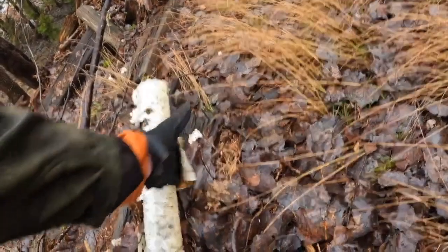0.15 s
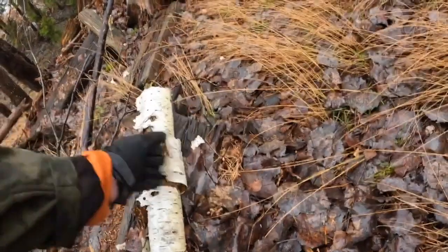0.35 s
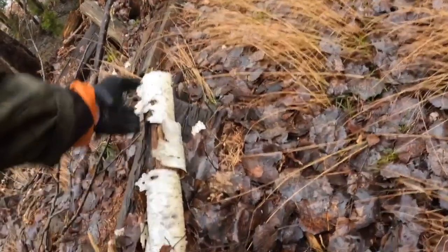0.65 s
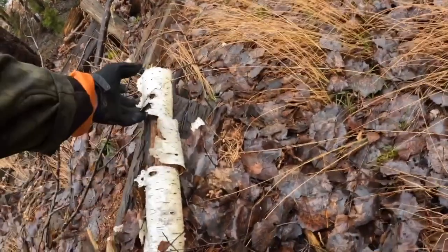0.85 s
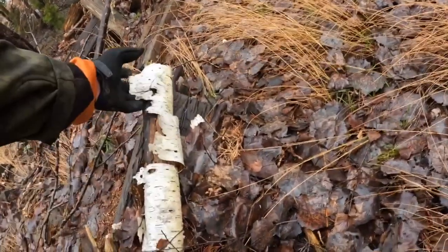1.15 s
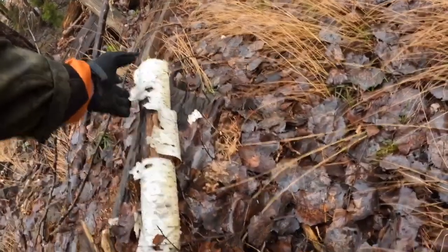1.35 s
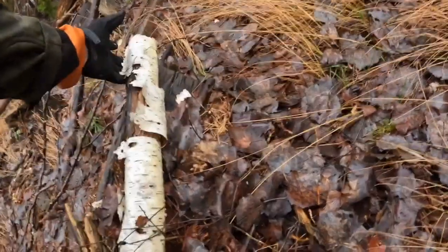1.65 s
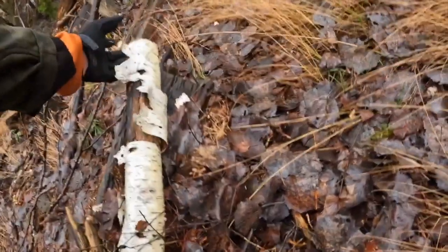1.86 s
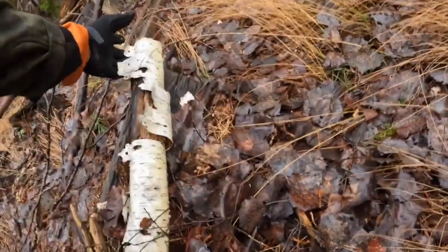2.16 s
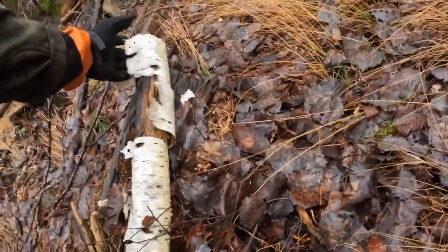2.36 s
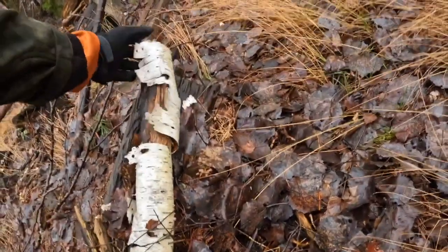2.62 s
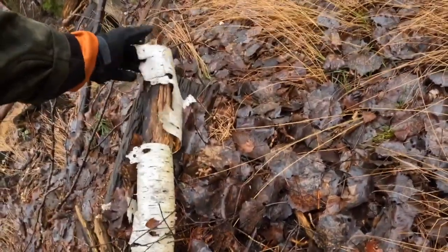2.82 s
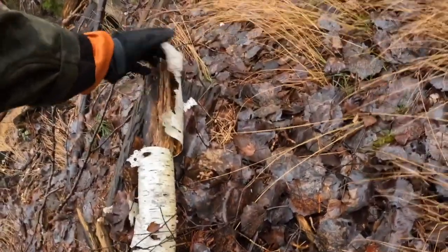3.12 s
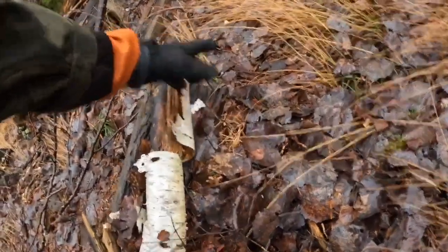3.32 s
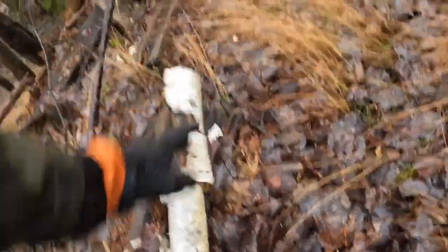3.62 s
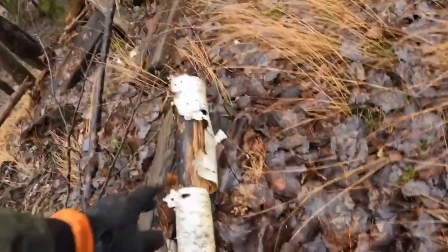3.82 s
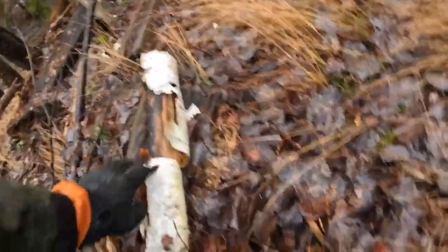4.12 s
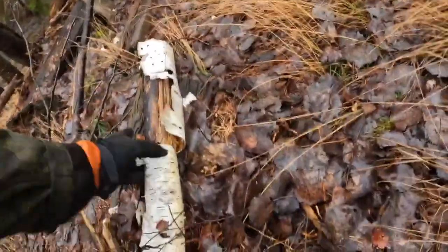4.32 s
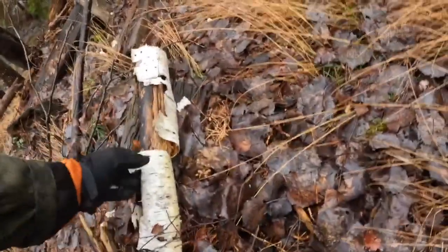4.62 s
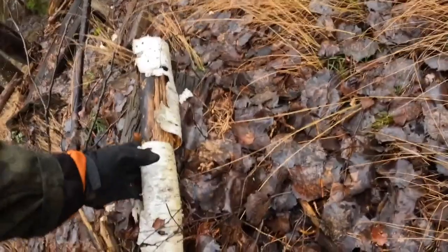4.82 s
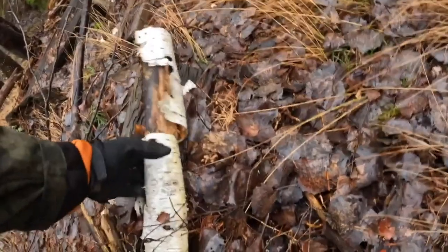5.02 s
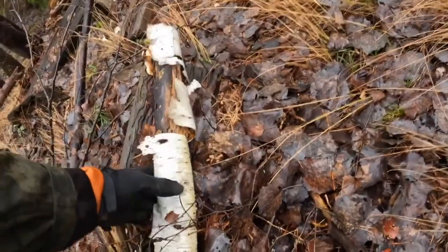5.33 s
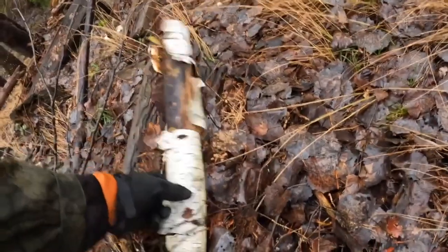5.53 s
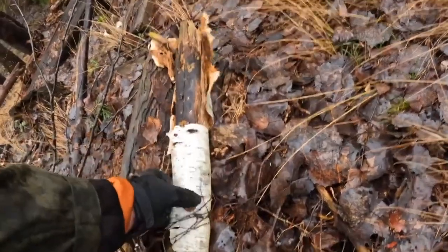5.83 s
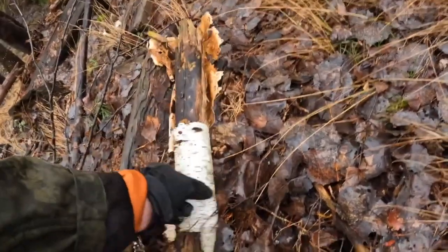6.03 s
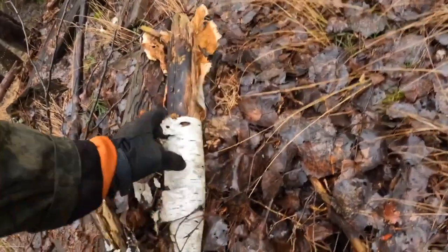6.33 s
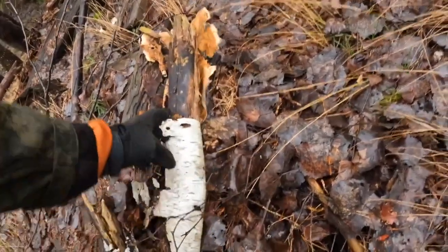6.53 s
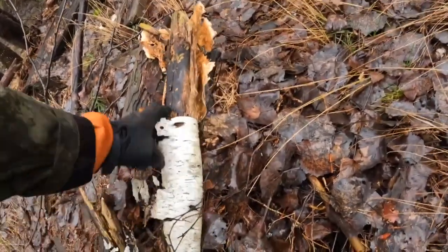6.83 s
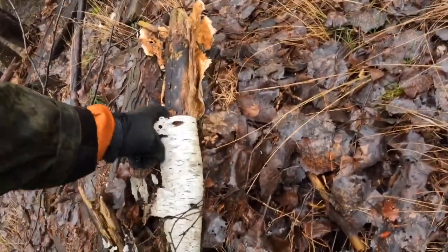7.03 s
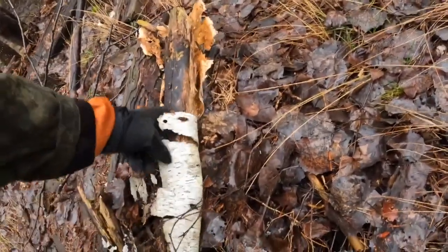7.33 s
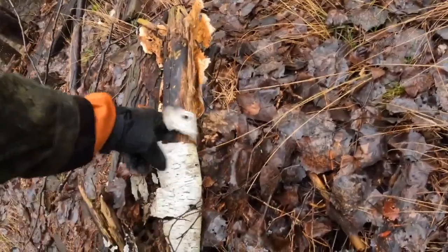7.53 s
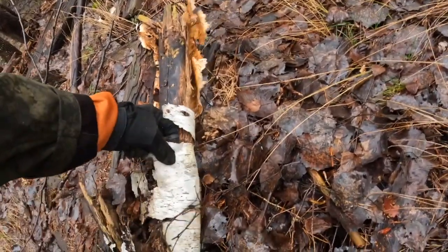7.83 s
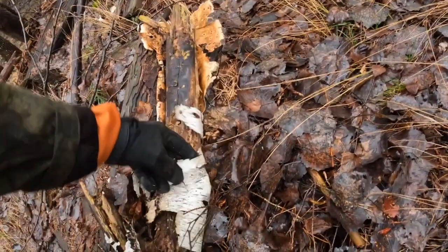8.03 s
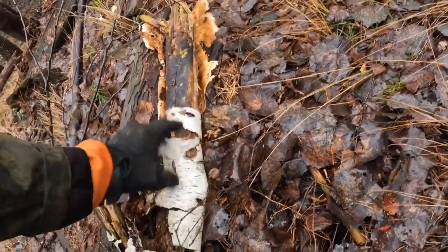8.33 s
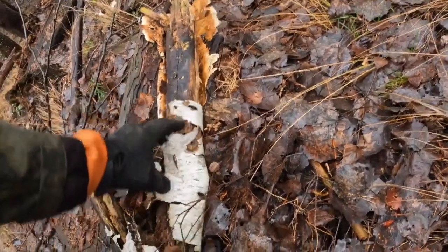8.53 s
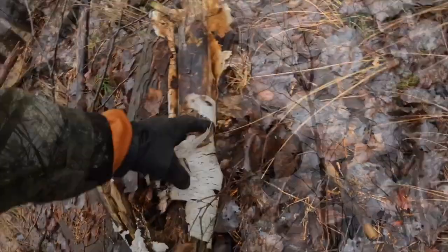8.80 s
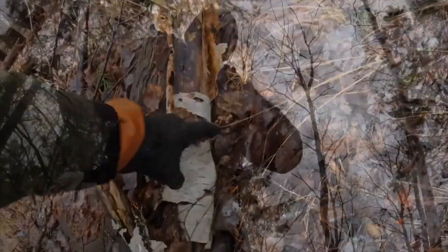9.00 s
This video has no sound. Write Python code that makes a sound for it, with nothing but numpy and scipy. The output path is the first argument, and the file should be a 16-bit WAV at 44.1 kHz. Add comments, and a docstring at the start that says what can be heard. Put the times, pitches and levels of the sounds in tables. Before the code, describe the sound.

Outdoors among quiet trees, a low uneven wind rumble and very faint airy hush run throughout. A gloved hand works dry bark an arm's length from the stereo microphone, nearly centred and with little reverberation. At 0 s a crisp crack and dull knock start it; sharp snaps follow at 1.1 s, with lighter crackles near 1.9 and 2.5-2.9 s. From 3 to 4.4 s it is sparser, with soft dull taps and a breathy sleeve swish on the left near 3.8 s. Cracking resumes at 4.5 s, with a bright snap at 4.9, then builds into dense papery tearing from 5.2 to 5.8 s. More clusters come at 6.0-6.25, 6.6 and 7.0-7.3 s, the last very bright. The loudest, woodiest breaks fall around 7.9-8.0 s. Snaps thin out; a tiny high glove squeak comes at 8.4 s, a lower wavering rough one at 8.8-8.9, then final cracks near 9 s.

```python
"""A gloved hand peels dry papery bark off a rotten branch on the forest floor, an arm's length away.
From the start there is a wind rumble and the faint hush of the woods, both made of shaped noise. Over them,
fibres snap as ringing bursts, bark rustles as flickering noise and loose pieces drop as short, dull rings.
A jacket sleeve swishes near the left port as smooth noise. Towards the end the glove squeaks twice:
a short high wavering tone, then a lower wavering stack of partials."""
import sys
import numpy as np
from scipy import signal
from scipy.fft import rfft, irfft
from scipy.io import wavfile
from scipy.ndimage import uniform_filter1d

SR = 44100
rng = np.random.default_rng(int(sys.argv[2]) if len(sys.argv) > 2 else 0)


def transcribe(u):
    """Save the signal u as a 16-bit wav file named by the first command-line argument.

    u: samples, shape (n,) or (channels, n), limited to [-1, 1]; the rate is SR.
    q: integer samples, one column per channel.
    """
    v = np.clip(np.atleast_2d(u).T, -1, 1)
    q = np.round(v * 32767).astype(np.int16)
    wavfile.write(sys.argv[1], SR, q)


def decibels_to_gain(level_db):
    """Convert a level in decibels to a linear amplitude gain (20 dB per decade)."""
    exponent = np.asarray(level_db, float) / 20
    return 10 ** exponent


N = 403956  # length in samples

# The louder fibres breaking. Each row: start in seconds, peak in dB at 1.3-6 kHz, ring in Hz,
# peak in dB of the sparkle above 6 kHz, burst length in ms.
SNAPS = [(0.0, -20, 2200, -26, 2.8), (0.2272, -41, 1200, -60, 1.6), (0.3769, -29.5, 2930, -62, 11),
         (1.056, -33, 5700, -38, 0.49), (1.0612, -21, 3420, -23, 0.4), (1.0826, -30, 3140, -42, 1.2),
         (1.093, -7.5, 3700, -49, 0.95), (1.1012, -22.5, 4220, -22, 3), (1.1224, -26, 1790, -32, 1.8),
         (1.1394, -18.5, 1870, -23, 2.36), (1.258, -36, 3080, -38, 6.8), (1.847, -25.5, 6100, -20, 1.1),
         (1.8546, -28.5, 7400, -21, 0.8), (1.889, -32, 4350, -30, 1.4), (1.9016, -37, 1570, -36, 2.8),
         (1.9196, -35, 1230, -47, 2.4), (1.9346, -40, 1790, -40, 3), (1.946, -25.5, 4950, -19, 1.4),
         (1.978, -37, 1830, -64, 1.8), (2.2126, -52, 4590, -43, 1.4), (2.379, -47, 5620, -36, 2),
         (2.435, -39, 6200, -40, 2.6), (2.474, -25.5, 3820, -32, 0.9), (2.4853, -19.5, 1540, -16, 0.25),
         (2.4878, -25.5, 4570, -23, 6.6), (2.7768, -39.5, 6300, -37.5, 7.4), (2.844, -33.5, 1790, -36, 2.0),
         (2.8827, -22, 5600, -29, 1.6), (2.9324, -16.5, 3620, -14.5, 4.7), (2.9413, -25, 5400, -25, 3),
         (3.1293, -46, 4330, -50, 1.2), (3.1443, -56, 3550, -43, 1.4), (3.2742, -45, 1660, -46, 6),
         (3.325, -37, 3680, -58, 6.3), (3.5392, -35, 2610, -50, 2.3), (3.5482, -34, 1590, -52, 5.4),
         (3.565, -31.5, 5360, -50, 0.7), (3.7636, -28, 2540, -52, 3.9), (4.0503, -42, 1210, -43, 5),
         (4.061, -41, 6060, -37, 2.9), (4.4312, -38.5, 1170, -44, 16), (4.5279, -32, 7250, -36.5, 21),
         (4.618, -23.5, 2040, -32, 1), (4.676, -33, 5060, -47, 2.2), (4.6853, -28, 2390, -34, 1),
         (4.7078, -33, 5680, -32, 4.3), (4.872, -25, 4290, -32, 1.8), (4.8818, -10.5, 2880, -13.5, 0.58),
         (4.9058, -23.5, 2320, -34, 3.1), (4.9283, -29, 2820, -37, 3.8), (4.967, -25.5, 3120, -23, 1.5),
         (4.9742, -25.5, 3080, -35, 1.6), (5.103, -20.5, 5550, -17.5, 0.95), (5.282, -23.5, 1660, -32, 4.9),
         (5.2963, -16.5, 3450, -18.5, 0.96), (5.3392, -19.5, 2960, -25, 1.2),
         (5.4019, -25, 1610, -30, 11.6), (5.417, -28.5, 1670, -32, 7.5), (5.475, -24.5, 2700, -32, 12),
         (5.495, -30, 2950, -30, 6.2), (5.5217, -15.5, 2940, -21, 1.8), (5.544, -21, 3830, -22, 2.1),
         (5.5645, -18, 3080, -29, 2.5), (5.6191, -14, 1720, -18.5, 2.8), (5.631, -18, 2820, -20, 1.3),
         (5.64, -13, 2740, -31, 1.6), (5.6628, -25, 1550, -53.5, 2.4), (5.7065, -11.5, 1150, -20, 3.2),
         (5.7188, -18.5, 2760, -42, 1.5), (5.7438, -10, 3970, -17.5, 2.04),
         (5.7732, -13.5, 2900, -20.5, 2.6), (6.0058, -13, 4200, -28, 1.3), (6.086, -18.5, 1430, -23.5, 3.6),
         (6.0953, -16, 1820, -32, 4.9), (6.116, -12.5, 2380, -25.5, 2.2), (6.124, -21.5, 1560, -34, 9),
         (6.1733, -28.5, 2090, -47, 1.8), (6.2, -25, 3000, -32, 13), (6.2374, -19.5, 2520, -27, 4.4),
         (6.2485, -19, 4950, -28, 2.5), (6.4346, -39.5, 3300, -47, 14), (6.5407, -36, 4050, -39, 2.8),
         (6.601, -23, 2900, -42, 4.2), (6.622, -31, 1240, -49, 4.3), (6.6419, -7, 1600, -17, 0.62),
         (6.843, -26.5, 3300, -44, 1.9), (6.8921, -19.5, 1170, -21.5, 6.2), (7.021, -21.5, 4240, -40, 5.3),
         (7.0251, -11.5, 4360, -18, 3.4), (7.1002, -17, 2400, -20, 2.1), (7.1851, -26, 1140, -38, 7.9),
         (7.207, -26, 4050, -26, 4.2), (7.23, -18, 4470, -33, 1), (7.2472, -24.5, 3920, -45, 1.8),
         (7.2721, -17.5, 2900, -27, 2.4), (7.3394, -7, 5600, -2, 1.73), (7.4354, -38.5, 3120, -44, 7.9),
         (7.4834, -38, 5000, -34, 1.4), (7.5092, -20, 2850, -34, 0.81), (7.658, -28, 4870, -21.5, 0.72),
         (7.6701, -30, 5250, -29, 2.2), (7.7462, -32, 2450, -32, 1.4), (7.76, -12.5, 1620, -14, 1.4),
         (7.7714, -31, 2970, -31, 2), (7.8154, -32.5, 1680, -36, 3.1), (7.8512, -36, 4180, -33, 2),
         (7.88, -7, 4380, -8, 0.81), (7.902, -29, 1960, -44, 2.4), (7.9183, -26, 3060, -49, 2.4),
         (7.955, -4, 1920, -5, 2.3), (7.9735, -18, 1750, -20, 2.3), (8.0075, -12, 1720, -20.5, 0.99),
         (8.0218, -13, 2740, -35, 2.3), (8.031, -18, 6800, -12.5, 1.4), (8.123, -26.5, 1510, -48, 2.8),
         (8.1683, -24, 5200, -52, 0.52), (8.3092, -31, 3600, -38, 2.8), (8.332, -22, 2620, -36, 2.6),
         (8.4532, -31, 2430, -55, 1.1), (8.7172, -34, 3800, -52, 4.1), (8.7465, -19.5, 5400, -42, 4.9),
         (8.7572, -20, 1610, -20.5, 2.8), (8.9517, -13, 2820, -16.5, 1.3), (9.0745, -23.5, 3620, -47, 3.2),
         (9.0873, -31, 1170, -33.5, 15), (9.1174, -30, 3750, -50, 1.6)]
# The tone colour of breaking bark. Each row: frequency in Hz, relative level in dB per Hz.
BARK_COLOUR = [(90, -23.5), (180, -9.5), (350, -15), (630, -11.5), (1300, -8), (1750, -5), (2250, -8.5),
               (2800, -6), (3500, -7.5), (4300, -7), (8000, -14.5), (9200, -20.5), (13000, -30),
               (16000, -61)]
# How bark leans to one side. Each row: frequency in Hz, left minus right in dB.
BARK_LEFT = [(60, 0), (3000, -0.2), (8000, 1.2), (15000, 2)]
# The hand bearing on the wood. Each row: time in seconds, extra body in dB.
PRESSURE = [(0, -17), (.2, 15), (.5, 0), (.9, -0.5), (1.8, -1.5), (4.3, -0.5), (4.7, 2), (6.2, 4.5),
            (7.8, 8), (8.3, 3), (9.16, 7.5)]
# Tugs of the fingers at the bark. Each row: time of the top in seconds, level in dB,
# rise in seconds, fall in seconds.
TUGS = [(0.0, -47.5, .01, .04), (.37, -52, .15, .05), (1.0, -62, .2, .1), (1.27, -60, 0.055, .3),
        (1.87, -48.5, .05, .2), (2.295, -52.5, .03, 0.091), (2.46, -51, .15, .05), (2.54, -55, 0.044, .1),
        (2.66, -60, .06, .08), (2.79, -52.5, .1, .2), (2.95, -47.5, .02, .05), (3.02, -57.5, .07, .15),
        (3.32, -52, 0.18, .2), (3.55, -56.5, .2, .1), (4.3, -62, .15, 0.22), (4.45, -50.5, .1, .05),
        (4.53, -44, .05, .3), (4.69, -45, .2, .05), (4.86, -51, .15, .05), (4.94, -41, .04, .06),
        (5.1, -39.5, .025, .07), (5.2, -36.5, .1, .25), (5.41, -37, .08, .06), (5.535, -38.5, 0.045, .2),
        (5.625, -33, .1, .04), (5.74, -38, .12, .2), (6.0, -39, .15, .06), (6.1, -40, 0.11, .1),
        (6.245, -38.5, .12, .05), (6.56, -52.5, .17, .05), (6.615, -40.5, .02, .06), (6.75, -58, .15, .15),
        (6.894, -38.5, 0.068, .05), (7.0, -45.5, .2, 0.24), (7.22, -41, 0.11, .1), (7.33, -43, 0.11, .02),
        (7.45, -51, .03, .08), (7.54, -49.5, .05, 0.055), (7.66, -44, .1, 0.086), (7.77, -47.5, .06, 0.055),
        (7.9, -44.5, .2, .08), (8.02, -34, .06, .06), (8.114, -42, .08, .09), (8.253, -41.5, .08, .1),
        (8.457, -48.5, .04, .03), (8.7, -48.5, .03, .1), (8.85, -57, .15, .15), (9.09, -50, .12, .2)]


def evened(x):
    """Scales to an average strength (rms) of 1."""
    return x / np.sqrt(np.mean(x ** 2) + 1e-20)


def read(points, hz):
    """Reads a table of (Hz, value) between its points, on a log-frequency axis."""
    f, value = np.transpose(points)
    return np.interp(np.log(hz + 1), np.log(f + 1), value)


def follow(points, t):
    """Reads a table of (seconds, value) in straight lines between its points."""
    return np.interp(t, *np.transpose(points))


def causal(db):
    """Turns gains in dB into a filter that responds as early as it can (minimum phase)."""
    cepstrum = irfft(np.log(decibels_to_gain(np.maximum(db, -100))))
    middle = cepstrum.shape[-1] // 2
    cepstrum[..., 1:middle] *= 2
    cepstrum[..., middle + 1:] = 0
    return np.exp(rfft(cepstrum))


def hiss(size, field_db, same, left, patchy_db):
    """Stereo noise from random short-time spectra; field_db(hz, t) shapes it, patches drift over it."""
    hop = size // 4
    hz = np.fft.rfftfreq(size, 1 / SR)[:, None]
    t = np.arange(N // hop + 5) * hop / SR
    a, b, c, d, patches = rng.standard_normal((len(t), len(hz), 5)).T
    patches = uniform_filter1d(patches, size=size // 64, axis=0)
    patches = evened(uniform_filter1d(patches, size=6, axis=1))
    # the second port shares part of the first one's noise
    likeness = np.clip(read(same, hz), -1, 1)
    first, other = a + 1j * b, c + 1j * d
    spectra = np.array([first, likeness * first + np.sqrt(1 - likeness ** 2) * other])
    spectra *= decibels_to_gain(field_db(hz, t) + patchy_db * patches)
    spectra *= decibels_to_gain(np.multiply.outer([.5, -.5], read(left, hz)))
    return signal.istft(spectra, nperseg=size, noverlap=size - hop)[1][:, :N]


def low_shelf(hz, corner_hz):
    """A smooth share of sound: 1 below the corner, 0 above."""
    return 1 / (1 + (hz / corner_hz) ** 4)


def add(mix, s, sound):
    """Mixes a stereo sound in at a time in seconds."""
    part = mix[:, round(s * SR):][:, :sound.shape[1]]
    part += sound[:, :part.shape[1]]


def swells(rows, t, level_column):
    """Level in dB of overlapping gestures, each rising to its top and falling away."""
    swell_db, bend = -15, 1.4  # change over one rise or fall time, and how curved it is
    rows = np.array(rows)[:, :, None]
    late = t - rows[:, 0]
    part = np.where(late < 0, -late / rows[:, 2], late / rows[:, 3])
    power = decibels_to_gain(rows[:, level_column] + swell_db * part ** bend) ** 2
    return 10 * np.log10(power.sum(0) + 1e-12)


def wind():
    """Lumpy low rumble on the microphone: low noise, nearly alike in both ports."""
    # Each row: frequency in Hz, relative level in dB per Hz.
    colour = [(8.8, -18), (15, 6.5), (51, 0.5), (101, -10), (142, -17.5), (157, -35), (299, -34),
              (384, -60.5), (500, -74), (650, -81), (1100, -120)]
    # Each row: time in seconds, level in dB before the lumps are added.
    gusts = [(0, -45.5), (.3, -43), (1.6, -44), (2.3, -41.5), (3.0, -44), (3.6, -43.5), (4.18, -37),
             (4.7, -41.5), (5.4, -44), (5.85, -41), (6.6, -45.5), (7.07, -39), (7.5, -43.5), (9.16, -46)]
    lumps_db, lump_s = 1.5, 0.14
    rumble = hiss(4096, lambda hz, t: read(colour, hz) + 0 * t,
                  same=[(20, .93), (300, .95)], left=[(20, 0)], patchy_db=1)
    t = np.arange(N) / SR
    lumps = np.interp(t / lump_s, np.arange(400), rng.standard_normal(400))
    return evened(rumble) * decibels_to_gain(follow(gusts, t) + lumps_db * lumps)


def woods():
    """The steady hush of air and far leaves: faint noise of one level."""
    # Each row: frequency in Hz, relative level in dB per Hz.
    colour = [(82, -76), (140, -4.5), (217, -13), (254, -10), (442, -26.5), (698, -29.5), (755, -44.5),
              (834, -42), (1120, -26.5), (6560, -31.5), (16000, -50.5)]
    # Each row: frequency in Hz, left-right likeness (1 means alike).
    same = [(60, 1), (240, 0.86), (950, 0.26), (3770, 0.37), (15000, 0.21)]
    hush = hiss(1024, lambda hz, t: read(colour, hz) + 0 * t, same, left=[(20, 0)], patchy_db=1)
    return decibels_to_gain(-60.5) * evened(hush)


def small_snaps():
    """Chance rows like SNAPS: small breaks scattered along the tugs, crowding where these are loud."""
    count, crowding = 90, .3
    above_peeling_db, spread_db, sparkle_db, middle_ms = 3.5, 3, -6, 2.05
    t = np.arange(0, N / SR, .001)
    level_db = swells(TUGS, t, level_column=1)
    crowd = np.cumsum(decibels_to_gain(crowding * level_db))
    place, size, ring, bright, length = rng.random((count, 5)).T
    s = np.interp((np.arange(count) + place) / count, crowd / crowd[-1], t)
    peak_db = np.interp(s, t, level_db) + above_peeling_db - spread_db * np.log(1 - 0.96 * size)
    ring_hz = 1600 * 4 ** ring
    bright_db = peak_db + sparkle_db + 16 * (bright - .5)
    ms = middle_ms * 8 ** (length - .5)
    return np.transpose([s, peak_db, ring_hz, bright_db, ms])


def snaps():
    """Each break is a ragged burst of tiny cracks ringing one patch of bark; leaves and twigs return it."""
    rows = np.vstack([SNAPS, small_snaps()])
    s, peak_db, ring_hz, sparkle_db, ms = rows.T[:, :, None]
    # low rings, long bursts and a pressing hand give more body under 1.3 kHz
    body_db = peak_db - 17.5 - 5.5 * np.log2(ring_hz / 2500) + 2.5 * np.log2(ms / 3.4)
    body_db += 0.63 * follow(PRESSURE, s)
    size = 4096
    t, hz = np.arange(size) / SR, np.fft.rfftfreq(size, 1 / SR)

    # one noise shared by the ports, then one for each port
    noise = rng.standard_normal((len(rows), 3, size))
    shared, per_port = noise[:, :1], noise[:, 1:]
    burst = decibels_to_gain(2.5 * rng.exponential(1, (len(rows), size)).clip(0, 4))  # ragged
    rise_s = .0001 + .00006 * ms  # long scrapes start softly
    burst *= (1 - np.exp(-t / rise_s)) * np.exp(-t / (np.clip(ms, .2, 20) / 1000))
    burst *= 1 + 1.33 * np.exp(-t / 0.00023)  # the first crack is the sharpest
    burst = burst[:, None]
    scatter = decibels_to_gain(-37) * np.exp(-t / 0.016) * (t < .08)  # off leaves and twigs, other for each port

    drive = rfft(shared * burst + per_port * (scatter + 0.15 * burst))
    drive *= decibels_to_gain(np.multiply.outer([.5, -.5], read(BARK_LEFT, hz)))
    # each spot is a little nearer one port
    lead_s = 12e-6 * rng.standard_normal((len(rows), 1, 1)) * np.array([[.5], [-.5]])
    drive *= np.exp(2j * np.pi * hz * lead_s)
    drive *= low_shelf(hz, 8300)  # the snaps are softened in the highest treble
    # the treble of each snap differs between the ports, so it sounds wider
    drive += .3 * (1 - low_shelf(hz, 9000)) * rfft(per_port * burst)

    # long scrapes ring less
    ring_db = 7 / (1 + ms / 8) * np.exp(-(np.log((hz + 1) / ring_hz) / 0.15) ** 2)
    below, above = low_shelf(hz, 1300), 1 - low_shelf(hz, 6000)
    middle = (1 - below) * (1 - above)
    sounds = 0
    for share, db in (below, body_db), (middle, peak_db), (above, sparkle_db):
        gain_db = read(BARK_COLOUR, hz) + ring_db + 20 * np.log10(share + 1e-9)
        band = irfft(drive * causal(gain_db)[:, None])
        peak = abs(band.mean(1)).max(1, keepdims=True)
        sounds += band * (decibels_to_gain(db) / peak)[:, None]
    out = np.zeros((2, N))
    for at, sound in zip(s[:, 0], sounds):
        add(out, at, sound)
    return out


def peeling():
    """Dense small cracks in clumps: the rustle flickers in all bands at once and carries sparse ticks."""
    # Each row: frequency in Hz, left-right likeness (1 means alike).
    same = [(60, 1), (240, 0.83), (950, 0.93), (3770, 0.97), (15000, 0.88)]
    crumbs_db, strain_s, crumbs_s = -28, 0.0072, 0.0086  # level under each break's peak; swell and fade

    def field_db(hz, t):
        """Bark colour, with clumps in time and more body where the hand presses."""
        clumps = 1.97 * evened(uniform_filter1d(rng.exponential(1, len(t)), size=3) - 1)
        return read(BARK_COLOUR, hz) + clumps + follow(PRESSURE, t) * low_shelf(hz, 1600)

    rustle = hiss(256, field_db, same, BARK_LEFT, patchy_db=3)
    # about 300 ticks a second, each dying away with a time constant of 1 ms
    ticks = (rng.random(N) < 300 / SR) * decibels_to_gain(1.5 * rng.exponential(1, N).clip(0, 4))
    rustle *= 1 + 0.73 * signal.lfilter([1], [1, -np.exp(-1 / (0.001 * SR))], ticks)

    # fibres strain before each loud break and crumbs rustle after it
    t = np.arange(0, N / SR, .001)
    crumbs_power = 0
    for s, db, *_ in SNAPS:
        fade = np.exp(-2 * abs(t - s) / np.where(t < s, strain_s, crumbs_s))
        crumbs_power = crumbs_power + decibels_to_gain(db + crumbs_db) ** 2 * fade
    tugs_power = decibels_to_gain(swells(TUGS, t, level_column=1)) ** 2
    level = np.sqrt(tugs_power + crumbs_power)
    return evened(rustle) * np.interp(np.arange(N) / SR, t, level)


def taps():
    """Pieces on leaves and the hand on wood: a short low ring, softly begun, with a quicker upper mode."""
    # Each row: start in seconds, peak in dB, pitch in Hz that the ring settles to.
    hits = [(0.0, -28.5, 632), (0.226, -35.5, 239), (0.384, -36.5, 180), (0.39, -40, 645),
            (1.711, -27, 140), (1.932, -39, 120), (2.935, -45, 188), (3.275, -40.5, 400), (3.344, -41, 255),
            (3.379, -39.5, 295), (3.445, -35.5, 237), (3.489, -32.5, 284), (3.629, -26, 265),
            (3.698, -40, 600), (5.28, -28, 627), (5.411, -27.5, 557), (5.614, -28, 643), (5.62, -34, 230),
            (5.645, -35, 280), (5.705, -27.5, 325), (6.121, -30, 637), (7.34, -26, 151), (7.6176, -42, 820),
            (7.7943, -42, 790), (7.828, -37.5, 700), (7.91, -32.5, 224), (7.9854, -30, 780),
            (7.956, -31, 395), (8.017, -35, 340)]
    t, out = np.arange(6000) / SR, np.zeros((2, N))
    # each mode falls by 60 dB in the time under which it is divided
    low_shape = decibels_to_gain(-60 * t / .028) * (1 - np.exp(-t / 0.0014))
    upper_shape = decibels_to_gain(-60 * t / 0.013) * (1 - np.exp(-t / 0.0011))
    bend = 1 + 0.23 * np.exp(-t / 0.0028)  # bends the phase of the first few ms
    for s, db, hz in hits:
        ring = np.sin(2 * np.pi * hz * t * bend) * low_shape
        ring += 0.69 * np.sin(2 * np.pi * 3.32 * hz * t) * upper_shape  # knock of the upper mode
        add(out, s, decibels_to_gain(db) * ring / abs(ring).max() * np.ones((2, 1)))
    return out


def sleeve():
    """Smooth rubbing of cloth as the arm moves, wide and leaning left: a bright hiss and a low rub."""
    # Each row: frequency in Hz, relative level in dB per Hz.
    colour = [(76, -44), (130, -23), (279, -6.5), (765, -28.5), (980, -26.5), (1100, -19.5), (1220, -27),
              (3260, -30), (4410, -31), (6470, -31), (9870, -44), (12100, -42), (16000, -61)]
    # Each row: frequency in Hz, left-right likeness (1 means alike).
    same = [(60, 0.61), (240, 1), (950, 0.84), (3770, 0.16), (15000, 0.39)]
    # Each row: frequency in Hz, left minus right in dB.
    left = [(60, 22), (180, -1.5), (550, 5.5), (1650, 9), (4970, 0.5), (15000, 15)]
    # Each row: time of the top in seconds, hiss level in dB, rise in seconds, fall in seconds,
    # low rub level in dB.
    swishes = [(.1, -52.5, 0.3, 0.074, -56), (.3, -54.5, 0.14, 0.35, -69), (.8, -49.5, 0.37, 0.13, -49.5),
               (1.55, -51.5, .12, 0.25, -61), (1.7, -48, 0.21, .1, -51), (3.5, -52.5, 0.22, 0.5, -54),
               (3.79, -43.5, 0.24, 0.15, -43.5), (4.9, -57, 0.9, 0.86, -55.5),
               (5.7, -69, 0.45, 0.29, -52.5), (6.33, -51.5, 0.2, 0.2, -52.5),
               (7.2, -58.5, 0.62, 0.25, -53.5), (8.27, -50.5, .2, 0.31, -52), (8.95, -54, 0.21, 0.2, -78)]
    cloth = hiss(1024, lambda hz, t: read(colour, hz) + 0 * t, same, left, patchy_db=1)
    low = signal.sosfiltfilt(signal.butter(3, 800, fs=SR, output="sos"), cloth)
    t, every = np.arange(0, N / SR, .005), np.arange(N) / SR
    hiss_db = np.interp(every, t, swells(swishes, t, level_column=1))
    rub_db = np.interp(every, t, swells(swishes, t, level_column=4))
    return evened(cloth - low) * decibels_to_gain(hiss_db) + evened(low) * decibels_to_gain(rub_db)


def glove():
    """The glove sticks and slips on the bark: uneven slips give a wavering, rough tone, then a lower stack."""
    # One list per squeak. Each row: time in seconds, slips per second in Hz,
    # level in dB before the partials are weighted and added.
    squeaks = [
        [(8.365, 1150, -66), (8.395, 1230, -58), (8.43, 1260, -66)],
        [(8.795, 320, -68), (8.83, 505, -59), (8.86, 470, -57), (8.9, 435, -55), (8.925, 400, -56),
         (8.942, 270, -63)],
    ]
    # Levels in dB of partials 1 to 4.
    partials_db = [2.5, -5, -1, -9]
    out = np.zeros((2, N))
    for rows in squeaks:
        s, hz, db = np.transpose(rows)
        t = np.arange(s[0], s[-1], 1 / SR)
        waver = 1 + .052 * evened(uniform_filter1d(rng.standard_normal(len(t)), size=150))
        turns = np.cumsum(np.interp(t, s, hz) * waver) / SR
        stack = np.zeros(len(t))
        for k, partial_db in enumerate(partials_db, 1):
            # the short high squeak keeps only its lowest partial, the lower squeak all four
            if k * hz.mean() < 2200:
                stack += decibels_to_gain(partial_db) * np.sin(2 * np.pi * k * turns)
        stack *= 1 + .45 * evened(uniform_filter1d(rng.standard_normal(len(t)), size=200))  # roughness
        stack *= np.sqrt(2) * decibels_to_gain(np.interp(t, s, db)) * signal.windows.tukey(len(t), .2)
        add(out, s[0], stack * np.ones((2, 1)))
    return out


def scene():
    """All sources added together at the two ports."""
    return wind() + woods() + snaps() + peeling() + taps() + sleeve() + glove()


def top_cut(x):
    """Nothing passes above the cut-off."""
    return signal.sosfilt(signal.butter(12, 16530, fs=SR, output="sos"), x)


def record(dry):
    """The converter clips at full scale."""
    mix = np.clip(dry, -1, 1)
    return top_cut(mix)


dry = scene()
out = record(dry)
transcribe(out)
```